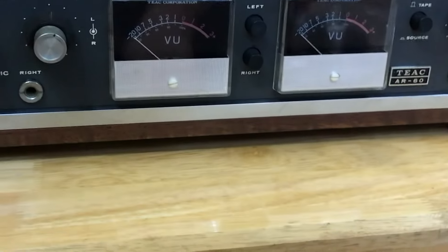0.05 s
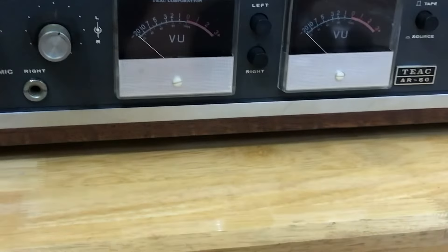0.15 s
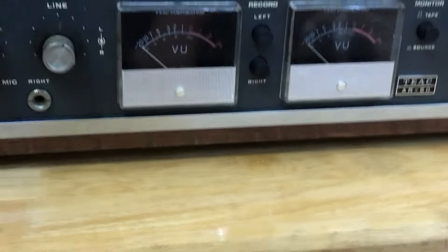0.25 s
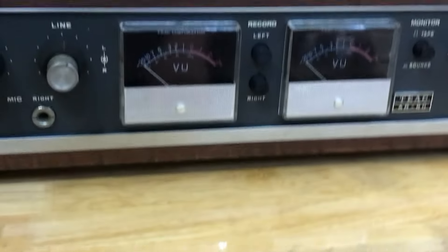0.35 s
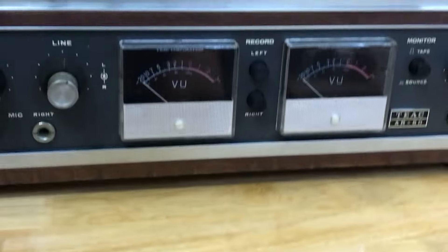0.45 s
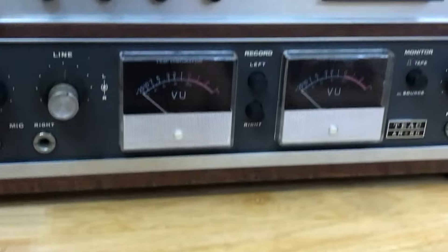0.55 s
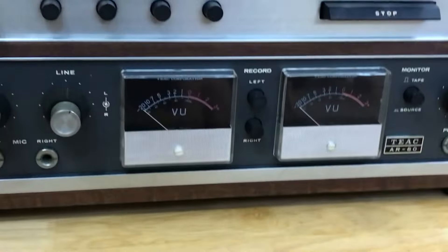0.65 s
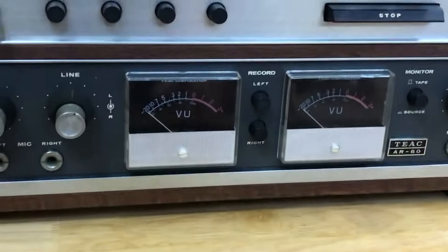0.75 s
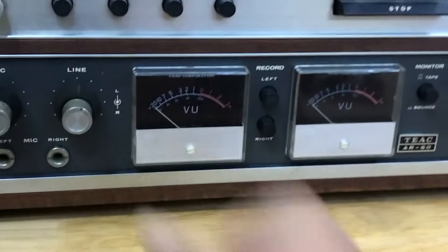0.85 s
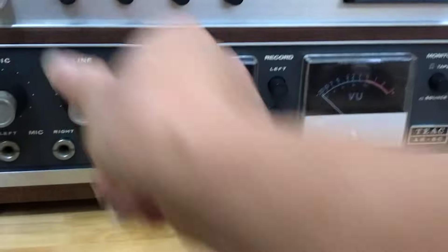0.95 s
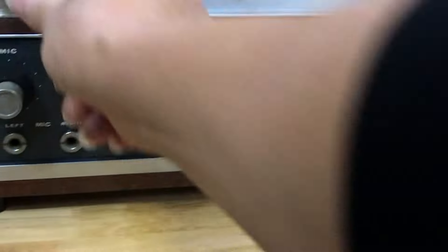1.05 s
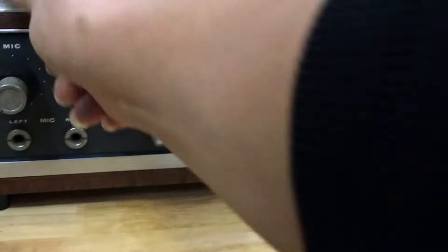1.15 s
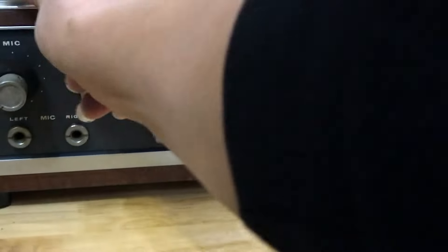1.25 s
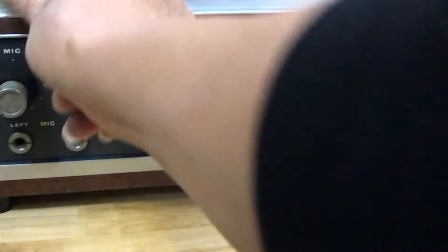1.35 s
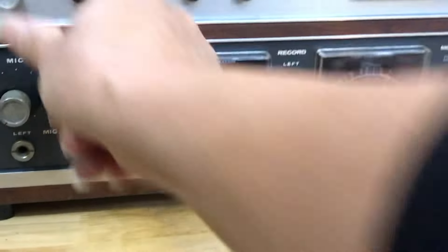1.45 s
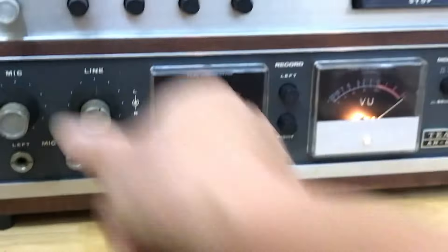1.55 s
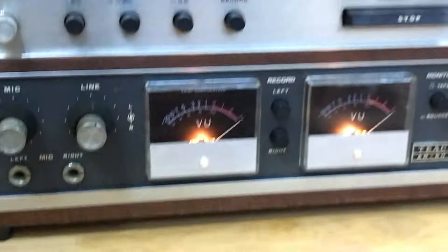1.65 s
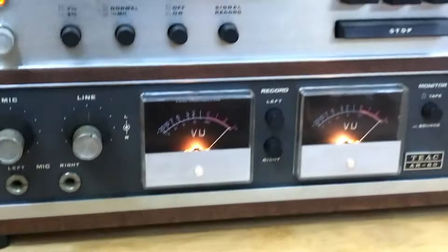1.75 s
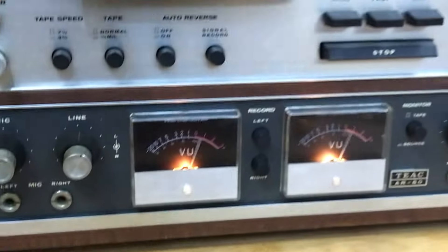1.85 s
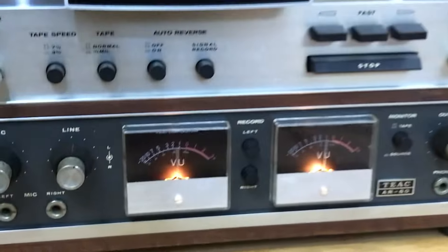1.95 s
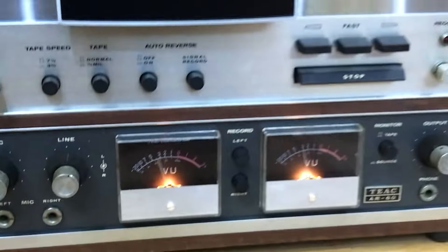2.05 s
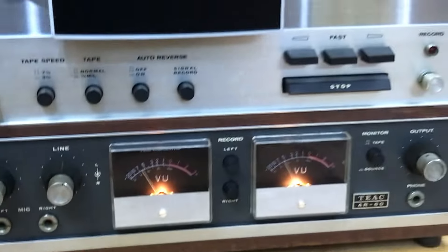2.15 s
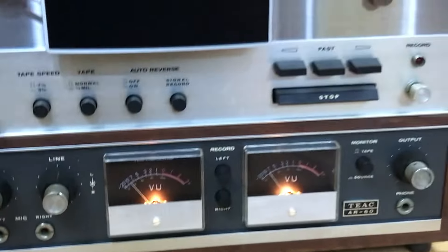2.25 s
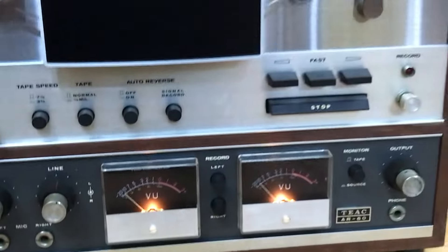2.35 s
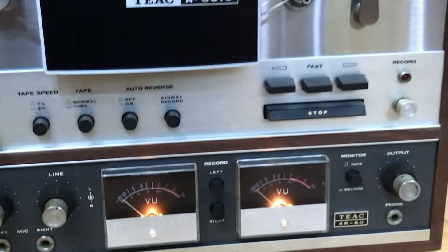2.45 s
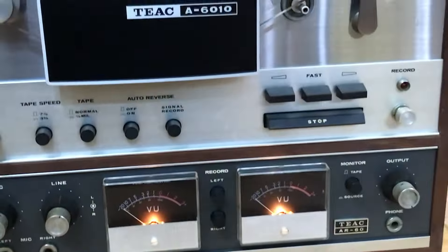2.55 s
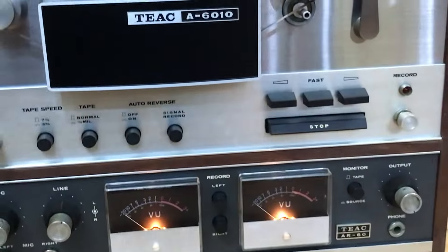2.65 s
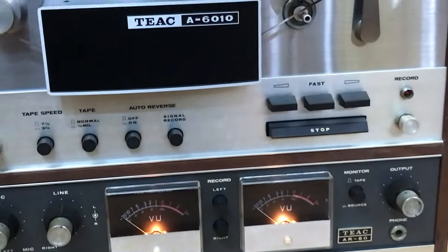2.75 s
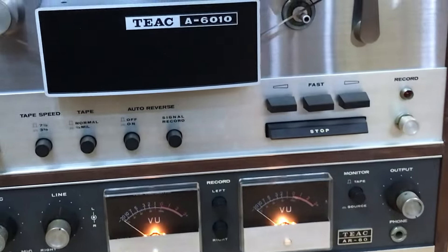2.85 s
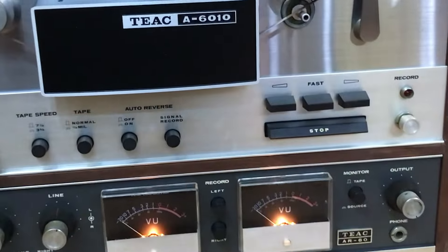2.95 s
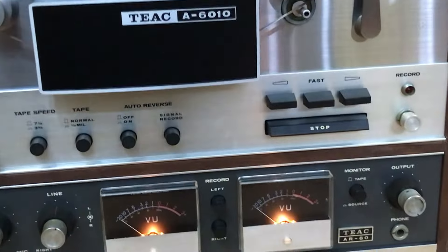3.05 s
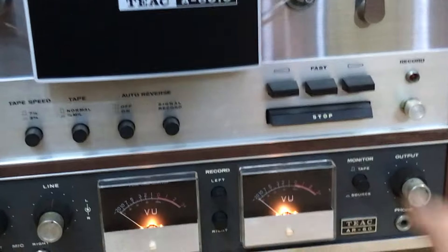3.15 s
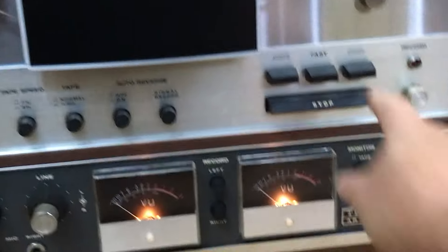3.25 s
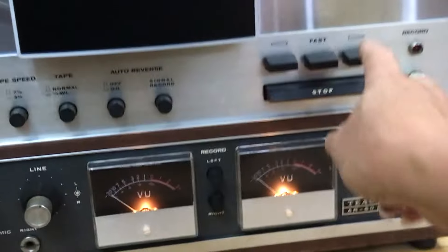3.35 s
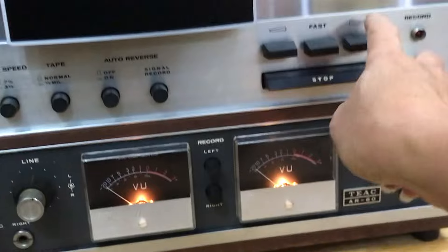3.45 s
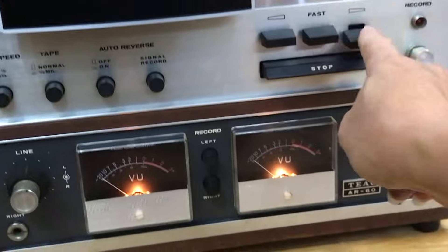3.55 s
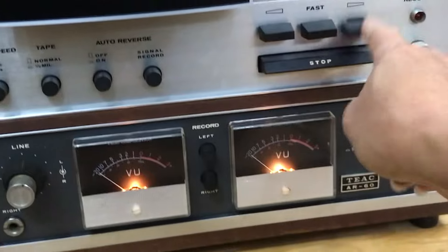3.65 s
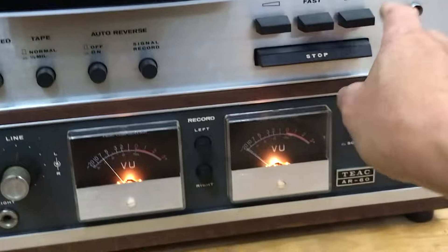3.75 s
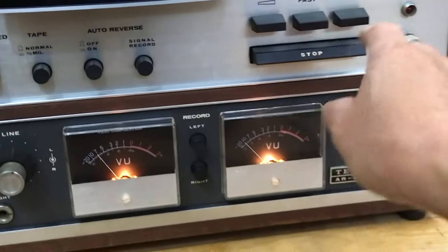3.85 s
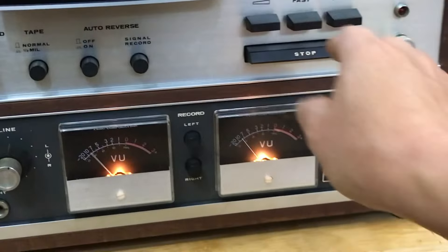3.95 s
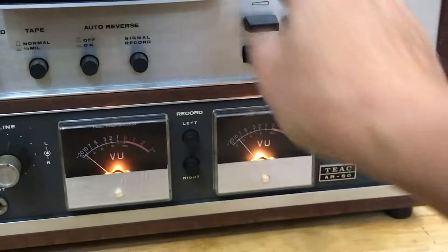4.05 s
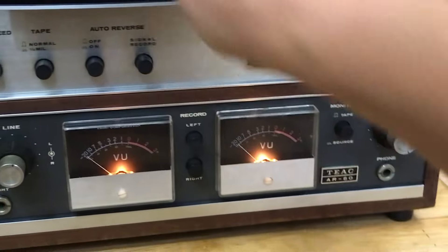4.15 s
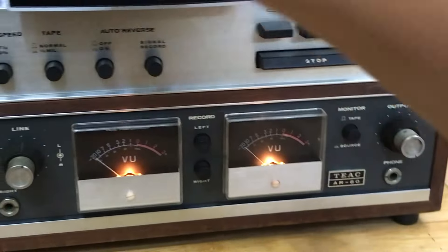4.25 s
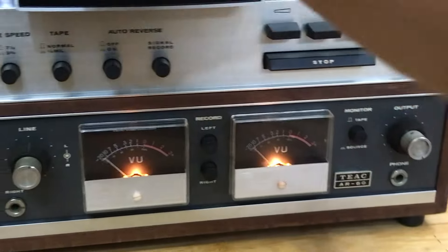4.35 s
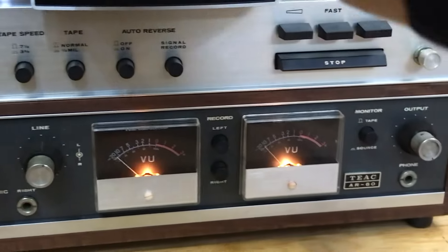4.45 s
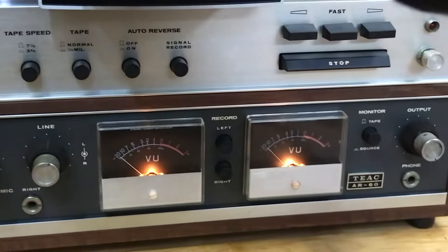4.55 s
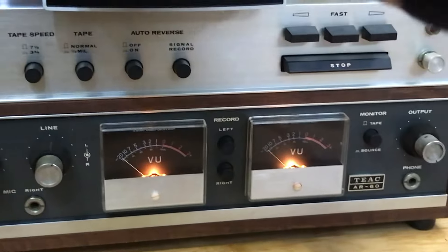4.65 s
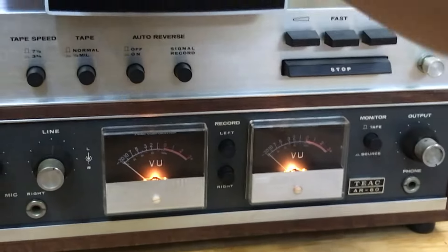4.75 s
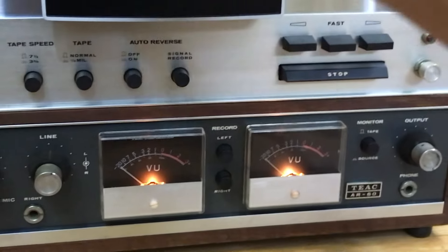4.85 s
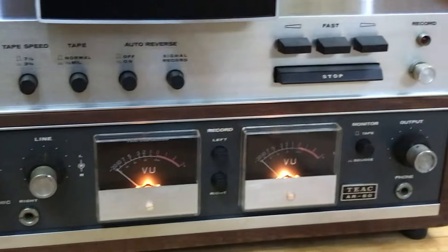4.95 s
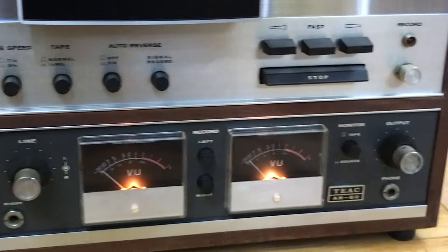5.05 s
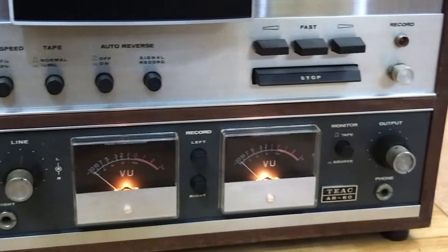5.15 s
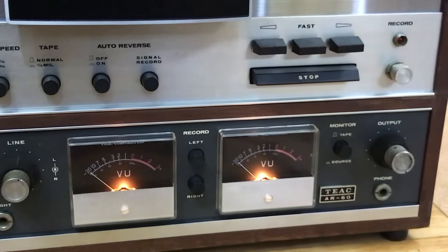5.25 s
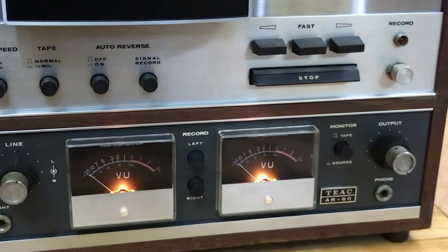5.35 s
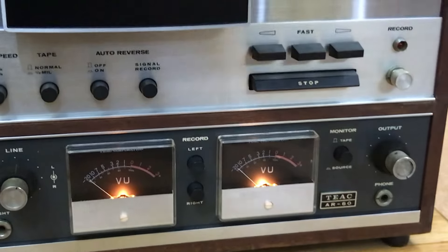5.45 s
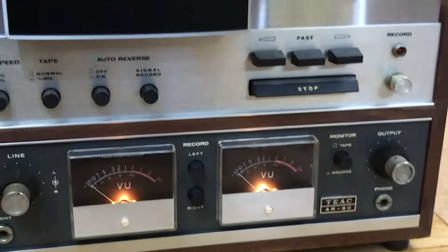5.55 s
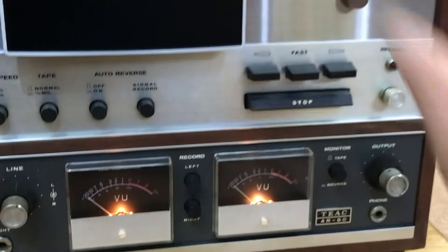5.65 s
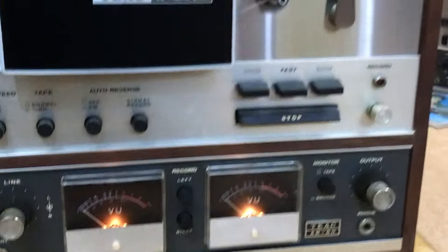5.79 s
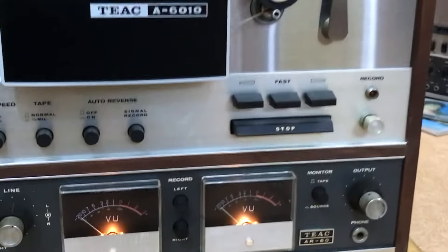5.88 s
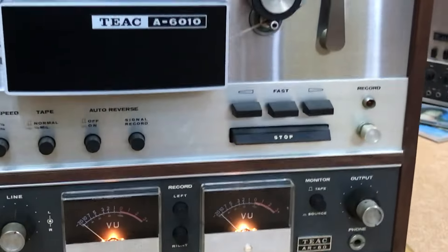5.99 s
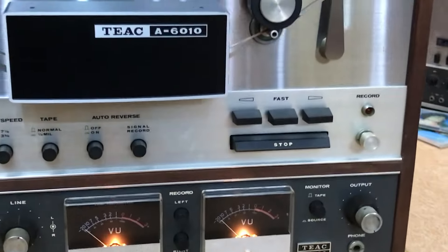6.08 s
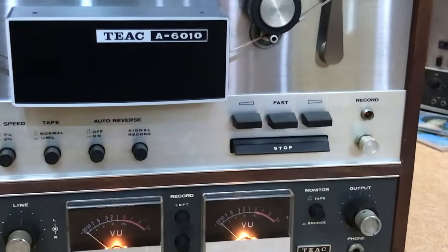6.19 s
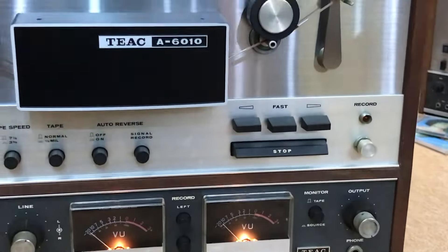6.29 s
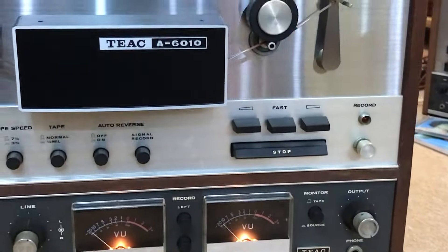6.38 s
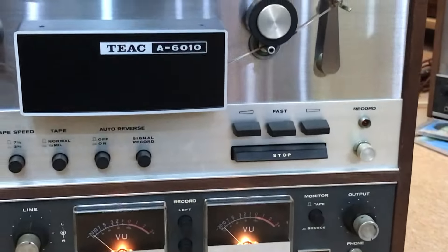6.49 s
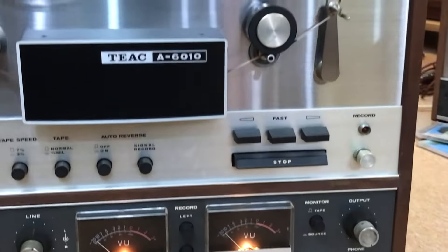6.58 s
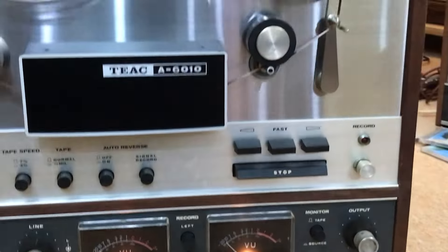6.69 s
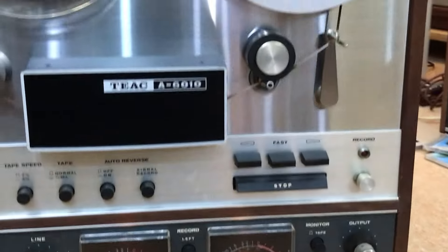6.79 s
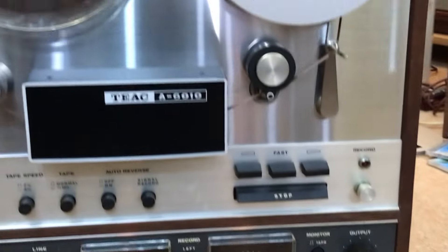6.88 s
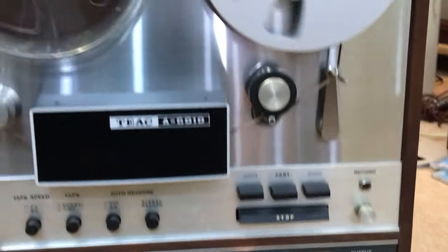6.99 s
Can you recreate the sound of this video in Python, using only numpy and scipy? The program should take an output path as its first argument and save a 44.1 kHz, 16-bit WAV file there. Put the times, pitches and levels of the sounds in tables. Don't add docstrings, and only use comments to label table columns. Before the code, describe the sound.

Sharp double click, a pause, then a louder rattling relay-and-solenoid clack, a later lever knock and faint ticking, with truck drone and soft hiss.

```python
import sys
import numpy as np
from scipy import signal
from scipy.fft import rfft, irfft
from scipy.io import wavfile
from scipy.ndimage import uniform_filter1d

SR = 44100
rng = np.random.default_rng(int(sys.argv[2]) if len(sys.argv) > 2 else 0)


def materialize(psi):
    bounded = np.clip(np.atleast_2d(psi).T, -1, 1)
    quanta = np.round(bounded * 32767).astype(np.int16)
    wavfile.write(sys.argv[1], SR, quanta)


def boost(x):
    u = np.asarray(x, float) / 20
    return 10 ** u


N = 309650
TIME = np.arange(N) / SR

# start in seconds, peak in dB, loudest band in Hz, rattle T60 in seconds,
# spectral tilt in dB per octave.
POWER_CONTACTS = [
    (1.199, -29, 13300, 0.004, 11),
    (1.2055, -26, 12000, 0.0095, -1),
    (1.207, -31, 1910, 0.07, -19),
    (1.2438, -12, 9300, 0.015, 4.5),
    (1.2445, -24, 1550, 0.04, -10),
    (1.258, -34, 1400, 0.26, 0),
    (1.3471, -17, 8350, 0.0056, 0),
    (1.349, -28.5, 4100, 0.027, -3),
    (1.357, -43, 3800, .014, 5),
]
TRANSPORT_CONTACTS = [
    (3.518, -33.5, 6650, 0.024, 2),
    (3.528, -27, 12400, 0.011, 7),
    (3.533, -28, 4500, .058, -0.5),
    (3.540, -18.5, 8000, 0.051, 1),
    (3.554, -27, 6060, 0.063, 2),
    (3.561, -29, 1500, 0.082, -7),
    (3.5758, -11.5, 6300, 0.039, 2.5),
    (3.581, -17, 11500, 0.041, -1),
    (3.6038, -6, 3200, .025, 1.5),
    (3.609, -14, 2050, 0.044, -.4),
]
# start in seconds, peak in dB,
# loudest band in Hz, rattle T60 in seconds.
TICKS = [(2.442, -50, 3060, 0.018), (2.889, -52, 5900, .015), (4.145, -50, 3622, .03),
         (4.352, -47, 4990, .015), (4.439, -50, 9300, .015), (4.545, -46.5, 4950, 0.033),
         (4.568, -46, 5500, 0.024), (4.907, -46.5, 4500, .02), (5.043, -50.5, 9500, .02),
         (5.185, -46, 4960, .02), (5.301, -48, 15300, .04), (5.3105, -52, 5800, .04),
         (5.33, -54, 6000, .12), (5.463, -51, 5950, 0.016), (6.017, -50, 5250, .021),
         (6.295, -52, 4380, .02), (6.850, -49.5, 4000, .017), (6.9395, -49.5, 9000, 0.022)]
PINGS = [
    (5.300, -46, 2440, .027),
    (5.3096, -44, 2440, .03),
]
# frequency in Hz, level in dB.
POWER_COLOUR = [(180, -50), (400, -30), (1040, -17), (1450, -3), (1900, -11), (2520, -13), (3300, -10),
                (4300, -9), (4900, -11), (5750, -9.5), (8090, -20), (9880, -15.5), (14500, -16),
                (16500, -39.5)]
TRANSPORT_COLOUR = [(120, -30), (250, -4), (430, -13.5), (750, -2.5), (1250, -5), (1650, 1), (2050, -5),
                    (2800, -5), (4000, -10), (5600, -7), (7680, -16.5), (8900, -10), (10300, -20),
                    (11700, -9.5), (16500, -24)]
# frequency in Hz, level in dB, T60 in seconds.
PANEL_MODES = [(612, -14, 0.1), (710, -4, 0.051), (980, -20, .05), (1400, -25, 0.054), (1900, -11, 0.024),
               (2040, -29, 0.032), (4330, -14, 0.13), (5700, -17, .05)]
CHASSIS_MODES = [(580, 13.5, 0.23), (920, -12, .06), (1256, -4, 0.14), (2810, -25, 0.24), (5300, -19, .06)]
CAPSTAN_MODES = [(711, -3, 0.03), (954, -0.5, 0.04), (998, -3, 0.039), (1384, -1.5, 0.018),
                 (2390, -13, 0.011)]
CASE_MODES = [(187, -16, 0.18), (238, -13, 0.13), (294.4, -1, 0.19), (316, 1.5, .14), (307, -15, 0.49),
              (370, -13.5, 0.19), (452, -10, 0.14), (581, -8.5, .2)]
LEVER_MODES = [(174, -15.5, 0.18), (254, -9.5, 0.087), (397, -12.5, 0.016), (600, -14.5, 0.1),
               (705, -12, 0.036), (903, -11, 0.047), (1000, -17.5, 0.17), (1120, 3.5, 0.012),
               (1604, 4, 0.012), (1954, -4, 0.015), (2780, -15, .012)]
# start in seconds, peak in dB, frequency in Hz, T60 in seconds.
POWER_RINGS = [(1.206, -37, 583, .16), (1.206, -34.5, 1027, 0.074), (1.206, -39, 1330, .03),
               (1.206, -33.5, 1840, 0.092), (1.213, -43, 3140, .04), (1.2442, -14.5, 1570, 0.041),
               (1.2442, -22, 1950, 0.038), (1.246, -26, 1300, 0.046), (1.248, -31.5, 1804, 0.15),
               (1.248, -38, 587, 0.18), (1.25, -38, 1000, .07), (1.2438, -30, 5810, .04),
               (1.246, -45, 5600, .3), (1.245, -40.5, 4280, .15), (1.245, -47, 6800, .2),
               (1.244, -39, 9450, .025), (1.244, -33.5, 9750, 0.11), (1.271, -37, 1300, .08),
               (1.276, -50, 1450, .12), (1.348, -41, 580, .14), (1.348, -38, 1028, 0.065),
               (1.348, -37, 1410, .05), (1.348, -34, 1830, 0.065), (1.349, -45, 3440, .12)]
TRANSPORT_RINGS = [(3.518, -43, 6500, .04), (3.5405, -24, 8400, .03), (3.5405, -31, 3063, .03),
                   (3.541, -32, 1435, 0.054), (3.541, -31, 2400, 0.033), (3.557, -37, 1330, .08),
                   (3.555, -41, 6550, .07), (3.5762, -16, 5520, .015), (3.5762, -21.5, 3050, 0.032),
                   (3.5765, -22, 1620, 0.042), (3.5762, -19, 11440, .025), (3.5762, -29, 12100, .015),
                   (3.581, -27, 5260, .04), (3.581, -25, 5860, .04), (3.6042, -8.5, 1700, 0.0084),
                   (3.6042, -5, 2670, 0.0088), (3.6042, -10, 1350, 0.016), (3.605, -24, 5286, .02),
                   (3.607, -25, 637, .05), (3.608, -35, 563.6, 0.3), (3.61, -31, 960, .14),
                   (3.61, -42, 1050, 0.34), (3.61, -38.5, 1220, 0.38), (3.61, -39, 2850, 0.41),
                   (3.61, -30, 3070, .1), (3.61, -46, 5240, 0.22), (3.61, -36, 8800, 0.22),
                   (3.612, -38, 1850, .12)]
SMALL_RINGS = [(3.8815, -42, 2390, 0.022), (4.601, -52, 1950, .03), (5.272, -48, 1400, .04),
               (5.3005, -52, 15600, .05), (5.3105, -49, 5540, 0.012), (5.3105, -35, 600, 0.037),
               (5.318, -59, 5700, 0.027)]
# start in seconds, peak in dB, push length in seconds.
SOLENOID_THUMP = [(3.6045, -19, 0.0015)]
LEVER_KNOCKS = [
    (4.5681, -19, 0.00039),
    (5.2735, -55, 0.0007),
    (5.3103, -35, 0.00083),
    (5.618, -47, .0006),
    (6.164, -49, 0.00066),
]
# frequency in Hz, T60 in seconds.
ROOM_T60 = [(200, 1), (1000, 0.5), (3000, 0.62), (8000, 0.52), (15000, 0.3)]
# start in seconds, peak in dB, frequency in Hz.
BUMPS = [(1.705, -33, 131), (1.915, -45, 108), (2.048, -38, 151), (2.43, -38, 140), (5.968, -49, 165),
         (6.765, -41.5, 151), (6.814, -44, 158), (6.878, -45, 168), (6.946, -43, 157)]
# harmonic number, level in dB.
MOTOR_HARMONICS = [(1, -55.5), (2, -64.5), (3, -56)]
# time in seconds, level in dB.
MOTOR_NEARNESS = [(1.4, -22), (1.7, -15), (2.1, -1), (2.4, 6.5), (2.7, 4.5), (3.0, -4), (3.3, 4.5), (4, -5),
                  (5.2, -2), (7.1, -7.5)]
# engine cycle rate in Hz, speed in m/s, nearest distance in metres, passing time in seconds.
LORRY_A = (25.25, 13.2, 14, 0.799)
LORRY_B = (30.6, 16, 11.6, 3.56)
# order number,
# swell centre in seconds, peak in dB, half-width in seconds.
ORDERS_A = [(2, 0.24, -41.5, 0.19), (2, 0.91, -39, 0.37), (4, 0.45, -40, 0.61), (4, 1.265, -42, 0.32),
            (4, 1.63, -62, .15), (5, 0.65, -41, 0.28), (5, 1.35, -46, 0.19), (5, 1.66, -52.5, 0.059),
            (6, 0.22, -43.5, 0.14), (6, 0.84, -41, 0.28), (6, 1.33, -38.5, 0.32), (6, 1.63, -46, 0.42),
            (3, 0.51, -56, .6), (7, 0.66, -50.5, 0.45), (9, 0.36, -55.5, 0.8), (12, 0.54, -59.5, 0.33),
            (13, 0.88, -63, 0.9), (14, 0.84, -56, 0.33)]
ORDERS_B = [(2, 2.32, -45, 0.22), (2, 3.44, -41, 0.6), (2, 4.6, -52, 0.31), (4, 2.7, -43, 0.14),
            (4, 3.29, -40, 0.48), (4, 4.33, -47, 1.12), (4, 6.4, -61, 0.3), (5, 2.4, -45, 0.15),
            (5, 2.85, -49.5, 0.29), (5, 3.6, -40.5, 0.16), (5, 4.57, -47.5, 1.18), (5, 7.1, -65, 0.38),
            (10, 3.4, -47.5, 0.49), (10, 3.93, -48.5, 0.41), (3, 4.18, -51, 0.49), (6, 5.2, -84, 0.72),
            (9, 2.7, -57.5, 0.29), (11, 4.37, -59.5, 0.92), (13, 4.4, -67, 1.4)]
# frequency in Hz, lift in dB.
LIFT_A = [(80, 9), (300, 11), (1100, 5), (3500, 15), (9000, 0.5)]
LIFT_B = [(80, -6), (300, 11.5), (1100, 0.5), (3500, 12.5), (9000, -5.5)]
# frequency in Hz, level in dB.
ROAD_COLOUR = [(15, -40), (25, -9), (48, -5.5), (142, 1.5), (168, -3.5), (194, -5), (242, -10.5),
               (308, -5.5), (487, -15.5), (868, -20), (980, -16.5), (2020, -25.5), (4940, -41), (6130, -52),
               (8000, -50.5), (10400, -68), (17600, -120)]
HISS_COLOUR = [(1760, -14), (3000, 1), (4050, 0.5), (4410, 2.5), (4870, -6.5), (5270, 0), (5910, 1.5),
               (7690, -6), (9060, -4), (12300, -6), (15100, -1.5), (16200, -13), (16500, -39)]


def on_log_axis(table, hz):
    f, v = np.transpose(table)
    return np.interp(np.log(np.maximum(hz, 1)), np.log(f), v)


def shaped(x, gain_of_hz):
    return irfft(rfft(x) * gain_of_hz(np.fft.rfftfreq(len(x), 1 / SR)), len(x))


def band_window(f, hz, per_octave):
    return np.cos(np.pi / 2 * np.clip(per_octave * np.log2(f / hz + 1e-9), -1, 1))


def unit(x):
    return x / np.sqrt(np.mean(x ** 2))


def walk(rate):
    hold = int(SR / rate)
    steps = np.repeat(rng.standard_normal(N // hold + 1), hold)
    return 1.42 * uniform_filter1d(uniform_filter1d(steps, hold), hold)[:N]


def add(out, s, piece):
    i = int(s * SR)
    out[i:i + len(piece)] += piece[:N - i]


def deck():
    power = contacts(POWER_CONTACTS, POWER_COLOUR, lift_db=6)
    power = power + boost(-32.0) * ring(power, PANEL_MODES) + rings(POWER_RINGS)
    transport = contacts(TRANSPORT_CONTACTS, TRANSPORT_COLOUR, lift_db=4)
    transport = transport + boost(-71) * ring(transport, CHASSIS_MODES) + rings(TRANSPORT_RINGS)
    tick_colour = [(1000, -12), (3000, 0), (13000, -9), (16000, -12)]  # (Hz, dB)
    ticks = contacts(TICKS, tick_colour, lift_db=6) + contacts(PINGS, tick_colour, lift_db=28)
    case = knocks(SOLENOID_THUMP, CASE_MODES, scatter_db=0, detune=0)
    running = boost(-3.5) * ticks + case + capstan()
    lever = knocks(LEVER_KNOCKS, LEVER_MODES, scatter_db=.5, detune=.005) + rings(SMALL_RINGS)
    return room([power, transport, running, lever], [-14.5, -13.0, -14.5, -17.5])


def contacts(events, colour, lift_db, rise_s=.00035):
    out, t, f = np.zeros(N), TIME[:4096], np.fft.rfftfreq(4096, 1 / SR)
    lead = 256
    band_share = .12
    rise = 1 - np.exp(-t / rise_s)
    for s, db, hz, t60, *tilt_db in events:
        envelope = rise * boost(-60 * t / max(t60, .003))
        burst = rfft(np.roll(rng.standard_normal(4096) * envelope, lead))
        burst /= np.sqrt(uniform_filter1d(np.abs(burst) ** 2, size=20))
        colour_db = on_log_axis(colour, f)
        colour_db = colour_db + sum(tilt_db) * np.log2(f / 3000 + 0.097)
        colour_db = colour_db + lift_db / (1 + ((f - hz) / (band_share * hz)) ** 2)
        rattle = irfft(burst * boost(colour_db))[lead:] * rise[:-lead]
        size = np.sqrt(np.sum(envelope ** 2) / np.sum(rattle ** 2)) / envelope.max()
        add(out, s, rattle * size * boost(db) / 2)
    return out


def ring(push, modes):
    out = 0
    for k, (hz, db, t60) in enumerate(modes):
        pole = np.exp(2j * np.pi * hz / SR - np.log(1000) / (t60 * SR))
        out = out + (-1) ** k * boost(db) * signal.lfilter([1], [1, -pole], push).imag
    return out


def rings(events, rise_cycles=1.4):
    out, t = np.zeros(N), TIME[:16384]
    for s, db, hz, t60 in events:
        envelope = boost(db - 60 * t / t60) * (1 - np.exp(-t * hz / rise_cycles))
        add(out, s, envelope * np.sin(2 * np.pi * hz * t))
    return out


def knocks(events, modes, scatter_db, detune):
    out, t = np.zeros(N), TIME[:16384]
    for s, db, push_s in events:
        push = np.sin(np.pi * np.minimum(t / push_s, 1)) ** 2
        chance = rng.standard_normal((len(modes), 2))
        struck = [(hz * (1 + detune * a), level + scatter_db * b, t60)
                  for (hz, level, t60), (a, b) in zip(modes, chance)]
        rung = ring(push, struck)
        add(out, s, rung * boost(db) / np.abs(rung).max())
    return out


def capstan(rub_s=0.02, scatter_db=2.4, settle_s=0.64):
    start_s, turn_s = 1.6315, .12557
    out, t, spot = np.zeros(N), TIME[:4096], rng.standard_normal(4096)
    for s in np.arange(start_s, N / SR, turn_s):
        chance = rng.standard_normal(4096)
        grain = spot + 1.1 * chance
        force = grain * (t / rub_s) ** 0.34 * np.maximum(1 - t / rub_s, 0) ** 1.3
        level_db = scatter_db * chance[-1] - 3.7 * np.exp((start_s - s) / settle_s)
        add(out, s, unit(ring(force, CAPSTAN_MODES)) * boost(level_db))
    return boost(-68) * unit(out)


def room(parts, wet_db, gap_s=0.0041):
    t, tail = TIME[:32768], 0
    for hz in 180 * 2. ** np.arange(7):
        band = shaped(rng.standard_normal(len(t)), lambda f: band_window(f, hz, 1))
        tail = tail + band * boost(-60 * t / on_log_axis(ROOM_T60, hz))
    tail *= 1 - np.exp(-(t / gap_s) ** 2)
    send = sum(boost(db) * x for x, db in zip(parts, wet_db))
    return sum(parts) + signal.fftconvolve(send, tail / np.sqrt(np.sum(tail ** 2)))[:N]


def motor(mains_hz=50.25):
    hum = 0
    for k, db in MOTOR_HARMONICS:
        hum = hum + boost(db) * np.sin(2 * np.pi * (round(k) * mains_hz * TIME + rng.random()))
    return np.sqrt(2) * hum * boost(np.interp(TIME, *np.transpose(MOTOR_NEARNESS)))


def bumps():
    out, t = np.zeros(N), TIME[:4096]
    envelope = (1 - np.exp(-t / 0.0022)) * boost(-60 * t / 0.061)
    for s, db, hz in BUMPS:
        add(out, s, -boost(db + 7.5) * np.sin(2 * np.pi * hz * t) * envelope)
    return out


def drone(lorry, swells):
    turned = np.cumsum(1 + .0015 * walk(6)) / SR
    cycles = lorry[0] * (turned - distance(lorry) / 343)
    out = 0
    for order in dict.fromkeys(round(row[0]) for row in swells):
        mine = [row for row in swells if round(row[0]) == order]
        size = 0
        for k, (_, s, db, width) in enumerate(mine):
            size = size + (-1) ** k * boost(db) / (1 + ((TIME - s) / width) ** 2)
        waver_db = .8 * walk(9)
        out = out + size * boost(waver_db) * np.sin(2 * np.pi * (order * cycles + rng.random()))
    return np.sqrt(2) * out


def distance(lorry):
    _, speed, nearest, passes = lorry
    return np.hypot(speed * (TIME - passes), nearest)


def traffic_db(hz):
    fall_off = 3.86
    power = 1
    for lorry, lift in [(LORRY_A, LIFT_A), (LORRY_B, LIFT_B)]:
        power = power + boost(on_log_axis(lift, hz)) ** 2 * (lorry[2] / distance(lorry)) ** fall_off
    return 10 * np.log10(power)


def road(flicker_db=1.1):
    out = 0
    for hz in 30 * 2 ** np.arange(0, 8.1, .5):
        band = shaped(rng.standard_normal(N),
                      lambda f: boost(on_log_axis(ROAD_COLOUR, f)) * band_window(f, hz, 2))
        lift_db = traffic_db(hz)
        out = out + band * boost(lift_db - lift_db.mean() + flicker_db * walk(6))
    return boost(-47.5) * unit(out)


def hiss():
    noise = shaped(rng.standard_normal(N),
                   lambda f: boost(on_log_axis(HISS_COLOUR, f)) * np.minimum(f / 3000, 1) ** 2)
    running = TIME - 3.6
    surge_db = 3 * np.exp(-np.abs(running) / 0.26)
    tape_db = (running > 0) * (2.15 + surge_db)
    return unit(noise) * boost(-71.5 + tape_db + traffic_db(9000))


def scene():
    indoors = deck() + motor() + bumps() + hiss()
    street = drone(LORRY_A, ORDERS_A) + drone(LORRY_B, ORDERS_B) + road()
    return (indoors + street)[None]


def top_cut(x):
    return signal.sosfilt(signal.butter(12, 16990, fs=SR, output="sos"), x)


def record(dry):
    x = signal.sosfilt(signal.butter(3, 38., "high", fs=SR, output="sos"), dry)
    x = signal.sosfilt(signal.ellip(10, .2, 80, 16650, fs=SR, output="sos"), x)
    return top_cut(x)


dry = scene()
out = record(dry)
materialize(out)
```